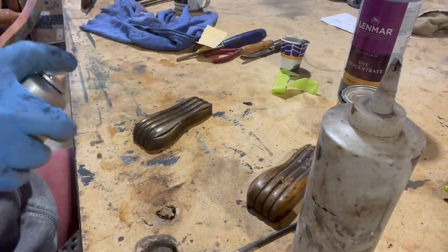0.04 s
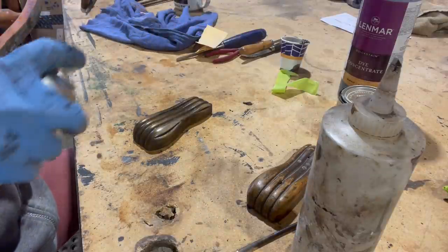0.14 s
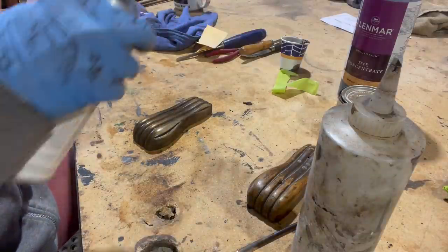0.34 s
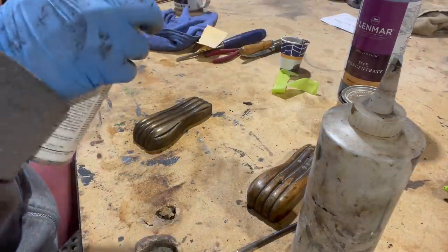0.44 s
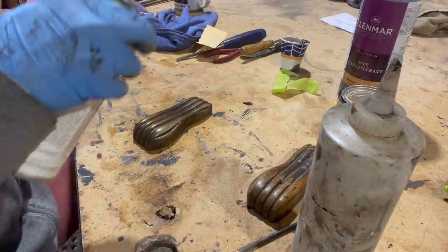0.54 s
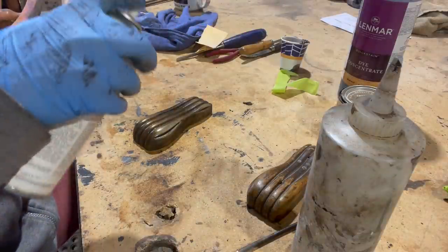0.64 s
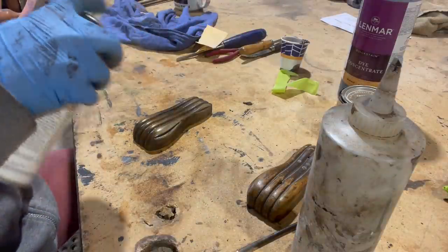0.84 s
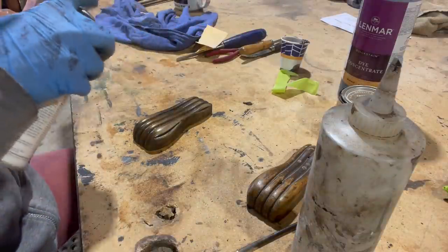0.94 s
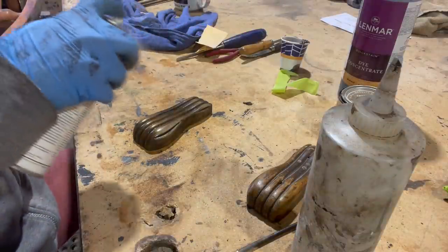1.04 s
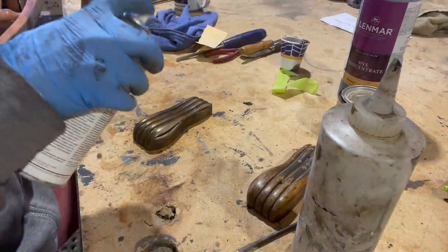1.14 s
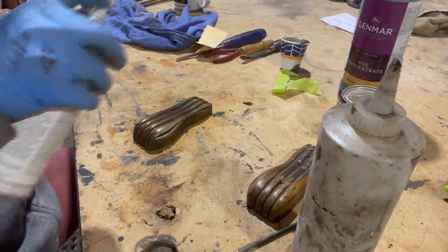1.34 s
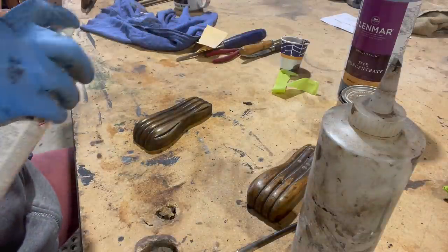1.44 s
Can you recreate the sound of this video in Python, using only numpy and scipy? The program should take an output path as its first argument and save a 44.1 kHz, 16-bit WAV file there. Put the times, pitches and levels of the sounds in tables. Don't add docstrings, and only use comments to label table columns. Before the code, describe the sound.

An aerosol can sprays three short, bright, whistling puffs. Between them the mixing ball ticks and rolls dully against the hand-damped metal. Close stereo phone pickup in a small workshop, brief room tail, faint low machine drone.

```python
import sys
import numpy as np
from scipy import signal
from scipy.fft import rfft, irfft, next_fast_len
from scipy.io import wavfile
from scipy.ndimage import uniform_filter1d, map_coordinates

SR = 44100
rng = np.random.default_rng(int(sys.argv[2]) if len(sys.argv) > 2 else 0)


def persist_wave(psi):
    counts = np.round(np.clip(psi, -1, 1) * 32767).astype(np.int16)
    wavfile.write(sys.argv[1], SR, np.atleast_2d(counts).T)


def volts(x):
    e = np.asarray(x, float) / 20
    return 10 ** e


N = 66150
T = np.arange(N) / SR

# frequency in Hz, likeness from 0 to 1.
AIR_ALIKE = [(40, 0.3), (250, 0.83), (800, 0.05), (6000, 0.05)]


def unit(x):
    return x / np.sqrt(np.mean(x ** 2) + 1e-20)


def along(points, hz):
    f, v = np.transpose(points)
    return np.interp(np.log(hz + 1), np.log(f + 1), v)


def wobble(rate):
    knots = rng.standard_normal(int(N * 400 / SR) + 4)
    return map_coordinates(knots, [T * min(rate, 400)])


def filtered(x, response):
    m = next_fast_len(N + SR // 2)
    return irfft(rfft(x, m) * response(np.fft.rfftfreq(m, 1 / SR)), m)[..., :N]


def peak(f, hz, width_hz):
    return 1j * f * width_hz / (hz * hz - f * f + 1j * f * width_hz)


def rush(gain, alike, patchy_db):
    z = signal.stft(rng.standard_normal((2, N)), nperseg=256)[2]
    patches = uniform_filter1d(rng.standard_normal(z.shape[1:]), size=3, axis=0)
    patches = unit(uniform_filter1d(patches, size=5, axis=1))
    pair = signal.istft(z * volts(patchy_db * patches), nperseg=256)[1][:, :N]

    def mid_side(hz):
        turn = np.arccos(np.clip(along(alike, hz), -1, 1)) / 2
        return gain(hz) * [np.cos(turn), np.sin(turn)]

    mid, side = filtered(pair, mid_side)
    return unit(np.array([mid + side, mid - side]))


def machine_hum():
    # pitch in Hz, width in Hz, level in dB.
    drones = [(67, 22, -61.5), (109.05, 16.7, -67.5)]
    # frequency in Hz, left-right likeness from 0 to 1.
    hum_alike = [(30, 1), (200, 0.9)]
    out = np.zeros((2, N))
    for hz, width_hz, db in drones:
        out += volts(db) * rush(lambda f: abs(peak(f, hz, width_hz)) ** 2, hum_alike, 0)
    return out


def still_air():
    # frequency in Hz, level in dB per Hz.
    air_tone = [(25, -17), (85, -3.5), (280, -23.5), (700, -25), (1500, -32), (5000, -39), (12500, -39),
                (16000, -55)]
    level_db = -68 + 0.7 * wobble(6.6)
    return volts(level_db) * rush(lambda f: volts(along(air_tone, f)), AIR_ALIKE, 0.56)


def workshop():
    balance_db = 2.4
    return (machine_hum() + still_air()) * volts([[balance_db / 2], [-balance_db / 2]])


def earlier_puff():
    t60 = 0.41
    tone = [(300, 2.5), (1500, 0.5), (15000, -7)]  # Hz, dB
    return volts(-63 - 60 * T / t60) * rush(lambda f: volts(along(tone, f)), AIR_ALIKE, 0.5)


def room(x):
    # frequency in Hz, t60 in seconds.
    decay = [(200, 0.35), (1500, .4), (5000, .35), (14000, 0.19)]
    wet_db, first_wall_s = -13.5, .008
    hz, t, z = signal.stft(rng.standard_normal((2, SR // 2)), SR, nperseg=256)
    tail = signal.istft(z * volts(-60 * t / along(decay, hz)[:, None]), SR, nperseg=256)[1]
    tail = tail / np.linalg.norm(tail[0])
    tail = np.pad(tail, ((0, 0), (round(first_wall_s * SR), 0)))
    return volts(wet_db) * signal.fftconvolve(x[None], tail, axes=1)[:, :N]


def rolls():
    # start in seconds, length in seconds, level in dB, wall pitch in Hz,
    # upper modes in dB.
    scrapes = [
        (-.02, 0.033, -57, 1263, -6.5),
        (.045, 0.069, -63, 1290, -6),
        (0.405, 0.046, -77.5, 1300, -2.5),
        (1.104, 0.063, -61.5, 1383, -10.5),
        (1.397, 0.099, -60.5, 1400, -18.5),
    ]
    glides = [
        (.058, .046, -64, 1320, -12),
        (.588, .096, -70, 1320, -17),
        (.885, .108, -77, 1650, -1),
        (1.247, .016, -62, 1370, -12),
    ]
    # multiple of the wall pitch, width in Hz, level in dB.
    upper_modes = [(1.27, 600, 2.5), (2.02, 630, 2.5), (2.45, 510, -4.5), (3.3, 780, -10.5),
                   (4.9, 790, -3.5)]
    lowest_width_hz, smooth_width = 360, .42
    bumps_per_s, bump_spread_db = 3000, 2.5
    edge = .3
    glide_per_s = .9
    steady = .8
    out = np.zeros(N)
    for (s, length, db, hz, upper_db), spread in [(r, 1) for r in scrapes] + [(r, smooth_width) for r in glides]:
        chance, size = rng.random((2, N))
        bumps = (chance < bumps_per_s / SR) * volts(-bump_spread_db * np.log(size + 1e-9))
        u = (T - s) / length
        stroke = np.sin(np.pi / 2 * np.clip(np.minimum(u, 1 - u) / edge, 0, 1)) ** 2
        cycles = hz * (T - s) * (1 + glide_per_s * (T - s) / 2)
        for multiple, width_hz, mode_db in [(0.94, lowest_width_hz, -upper_db)] + upper_modes:
            hits = bumps * rng.standard_normal((2, N))
            a, b = filtered(hits, lambda f: 1 / (1 + 2j * f / (spread * width_hz)) ** 2)
            a = a + steady * (1 - spread) * a.std()
            phase = 2 * np.pi * multiple * cycles
            ringing = unit(a * np.cos(phase) + b * np.sin(phase))
            out += volts(db + upper_db + mode_db) * stroke * ringing
    return out


def ticks():
    # start in seconds, peak in dB, lowest mode in Hz, upper wall modes in dB,
    # crack in dB.
    wall_blows = [(.0018, -51, 1300, -2, 4), (.0722, -56, 1270, 3, -2), (.0838, -51, 1300, -12, -12),
                  (.1172, -53, 1640, 0, -10), (.1826, -50, 1500, 8, -16), (.4135, -63, 1310, -3, -15),
                  (.4288, -55, 1340, 2, -12), (.599, -66, 1200, 7, -20), (.609, -65, 1200, 6, -20),
                  (1.2317, -41, 1330, 1, 4), (1.2458, -48, 1320, -6, -16), (1.2492, -55, 1330, 0, 10)]
    # start in seconds, peak in dB,
    # main upper mode in Hz, upper wall modes in dB, crack in dB.
    rim_blows = [
        (.6558, -67, 3150, 14, -24),
        (.6655, -74, 3150, 14, -24),
        (.714, -77, 2600, 12, -16),
        (1.003, -45, 3350, 14, -22),
        (1.0088, -45, 3350, 14, -14),
    ]
    # frequency in Hz, level in dB, t60 in seconds.
    can_modes = [(1324, 0, .02), (2040, -14, .017), (3488, -5, .014), (3946, -11, .019), (4500, -15, .012),
                 (6659, -9, .0085), (7483, -9, .008), (9679, -19, .01), (12000, -24, .008)]
    rim_multiple = 2.63
    upper_hz, crack_hz = 2500, 5500
    detune, scatter_db = .015, 1.5
    strike_s = .0003
    snap_db, snap_t60 = -20, .006
    thin_hz = 950
    out, t = np.zeros(N + SR), np.arange(SR // 20)[:, None] / SR
    hz, level_db, t60 = np.transpose(can_modes)
    blows = wall_blows + [(s, db, main_hz / rim_multiple, *colour) for s, db, main_hz, *colour in rim_blows]
    luck = rng.standard_normal((len(blows), 2, len(can_modes)))
    for (s, db, low_hz, upper_db, crack_db), (size, tune) in zip(blows, luck):
        colour_db = level_db + scatter_db * size + upper_db * (hz > upper_hz) + crack_db * (hz > crack_hz)
        pitch = hz * (1 + detune * tune) * np.where(hz > crack_hz, 1, low_hz / hz[0])
        ring = volts(colour_db - 60 * t / t60) * np.sin(2 * np.pi * pitch * t) * (1 - np.exp(-t / strike_s))
        snap_fade = volts(snap_db + upper_db + crack_db - 60 * t[:, 0] / snap_t60)
        snap = snap_fade * rng.standard_normal(len(t))
        out[round(s * SR):][:len(t)] += volts(db) * (ring.sum(1) + snap)

    def thinning(f):
        r = f / thin_hz
        return (1j * r) ** 2 / (1 + 1.3j * r - r ** 2)

    return filtered(out[:N], thinning)


def spray():
    # time in seconds, flow in dB, brightness in dB.
    puffs = [
        [(0.185, -83, -28), (0.193, -49, -3), (0.203, -45, 7.5), (0.289, -42.5, 4), (0.315, -45.5, 8),
         (0.345, -68, -4)],
        [(0.732, -73, -30), (0.74, -54, 3), (0.758, -45, 7), (0.814, -47.5, 5), (0.85, -78, 3)],
        [(1.008, -51, -2), (1.03, -45.5, 4), (1.048, -43.5, 4.5), (1.086, -46.5, 9.5), (1.11, -55.5, 9),
         (1.135, -74, -32)],
    ]
    leak = [(.9895, -75, -4), (.9906, -58, -4), (.994, -64, -12), (1.008, -62, -16)]
    # low resonance in Hz, high resonance in Hz, low lift in dB, whistle in dB,
    # left over right in dB.
    nozzle = [
        (3670, 5240, 2, -6, 0.2),
        (2710, 4180, 4, -6.5, -0.5),
        (3070, 4710, 9.5, 0.5, -0.5),
        (1400, 3000, 19, 3, 6),
    ]
    # frequency in Hz, level in dB per Hz.
    body_tone = [(150, -6), (500, -16.5), (1300, -1), (2100, -6.5), (4500, -1.5), (6500, -10.5),
                 (9000, -4.5), (16000, -52)]
    # frequency in Hz, level in dB per Hz.
    fizz_tone = [(4000, -27), (6500, -8.5), (8500, -4), (11000, -7.5), (14000, -0.5), (15500, -8),
                 (16500, -60)]
    # frequency in Hz, left-right likeness from 0 to 1.
    jet_alike = [(200, 0.41), (1200, 0.63), (3000, 0.92), (5000, 0.73), (6200, 0.13), (8000, 0.27),
                 (16000, 0.27)]
    width_hz, sputter_db, patchy_db = 580, 1.5, 2
    whistle_grows = 0.92
    out = np.zeros((2, N))
    for rows, (low_hz, high_hz, lift_db, whistle_db, pan_db) in zip(puffs + [leak], nozzle):
        s, flow_db, bright_db = np.transpose(rows)
        open_db = np.interp(T, s, flow_db, -140, -140)

        def cap(f):
            return volts(along(body_tone, f) + lift_db * abs(peak(f, low_hz, width_hz)) ** 2)

        whistle = rush(lambda f: abs(peak(f, high_hz, width_hz)) ** 2, jet_alike, patchy_db)
        whistle *= volts(whistle_db + whistle_grows * (open_db - flow_db.max()))
        fizz = rush(lambda f: volts(along(fizz_tone, f)), jet_alike, patchy_db)
        fizz *= volts(np.interp(T, s, bright_db))
        body = rush(cap, jet_alike, patchy_db) + whistle
        body *= volts([[pan_db / 2], [-pan_db / 2]])
        out += volts(open_db + sputter_db * wobble(150)) * (body + fizz)
    return out


def scene():
    jet = spray()
    ball = ticks() + rolls()
    close = jet + ball * volts([[-.4], [.4]])
    return close + room(jet[0] + ball) + earlier_puff() + workshop()


def phone_ports(dry):
    # frequency in Hz, lead of the right port in radians.
    port_turn = [(4500, .1), (6200, 1.1), (7300, 2.7), (8100, 3.1), (9500, 1.4), (11300, .05),
                 (13000, -.05), (15000, -1.3)]
    # frequency in Hz, side level in dB.
    port_width = [(5500, 0), (7200, -11), (8300, -12), (9500, -5), (11500, -24), (13300, -18), (15000, -3)]
    near = [(3000, 0)]
    mid = dry.mean(0)
    side = filtered((dry[0] - dry[1]) / 2, lambda f: volts(along(near + port_width, f)))
    pair = np.array([mid + side, mid - side])
    return filtered(pair, lambda f: np.exp(.5j * along(near + port_turn, f) * [[-1], [1]]))


def band_limit(x):
    return signal.sosfilt(signal.butter(12, 16840, fs=SR, output="sos"), x)


def record(dry):
    mix = phone_ports(dry)
    return band_limit(mix)


dry = scene()
out = record(dry)
persist_wave(out)
```